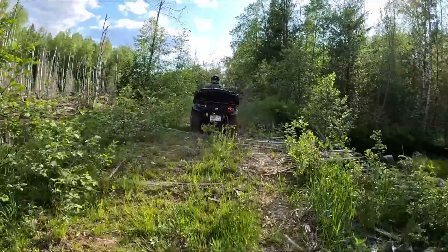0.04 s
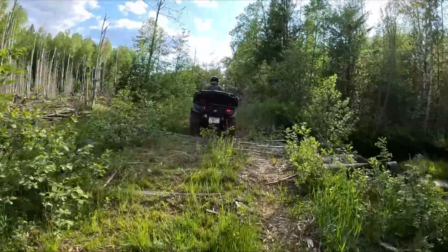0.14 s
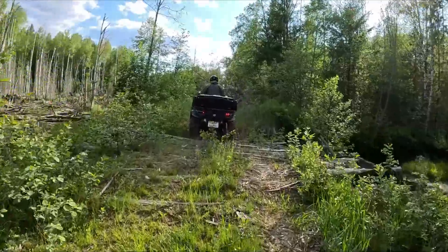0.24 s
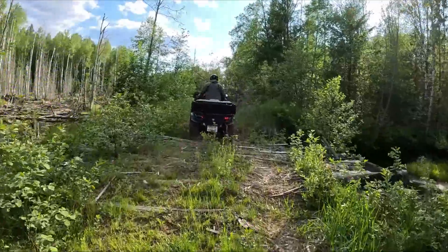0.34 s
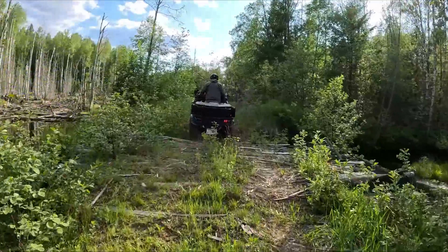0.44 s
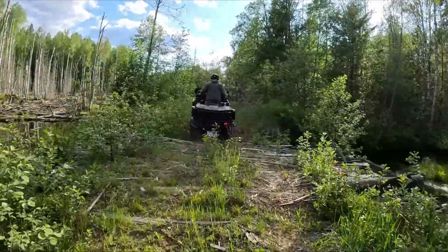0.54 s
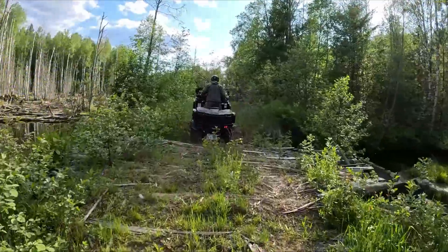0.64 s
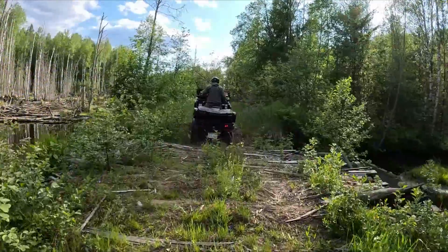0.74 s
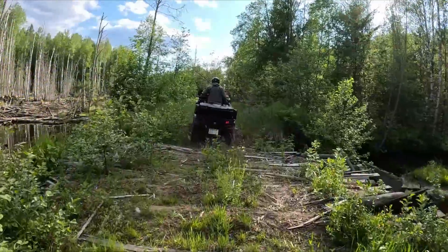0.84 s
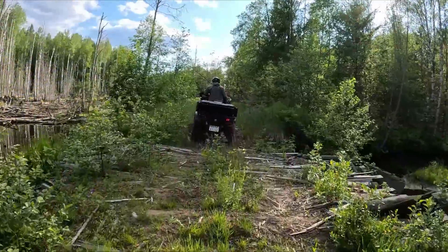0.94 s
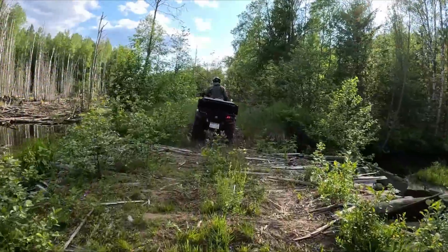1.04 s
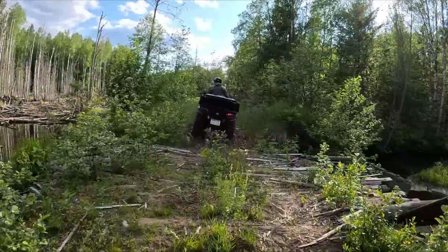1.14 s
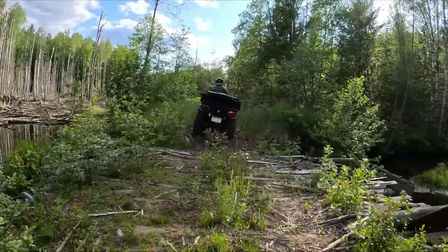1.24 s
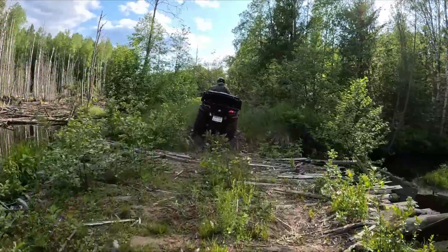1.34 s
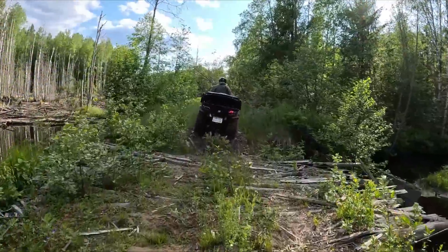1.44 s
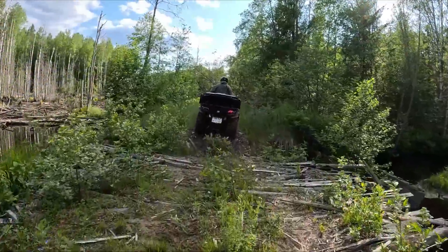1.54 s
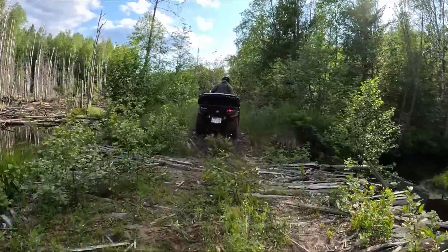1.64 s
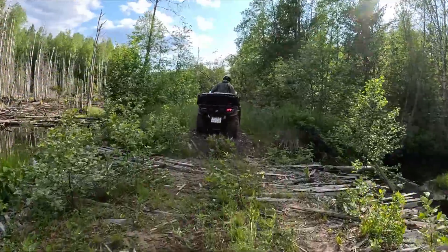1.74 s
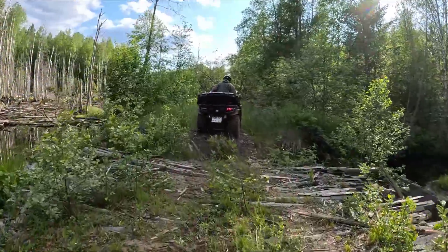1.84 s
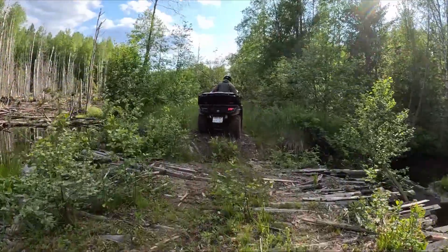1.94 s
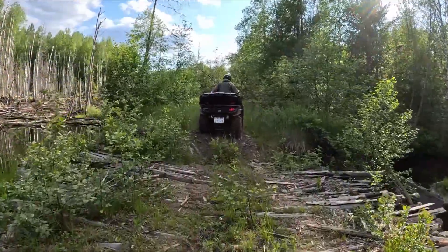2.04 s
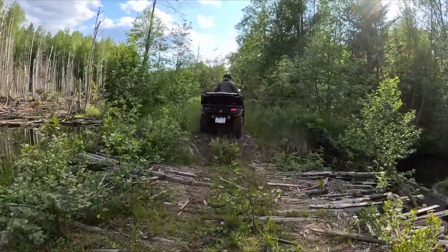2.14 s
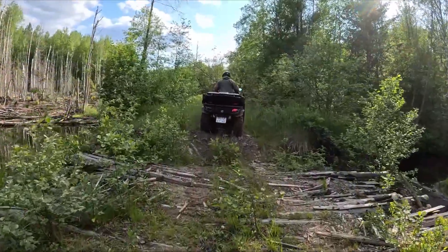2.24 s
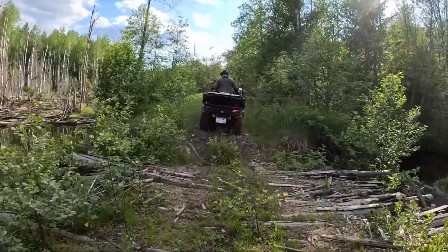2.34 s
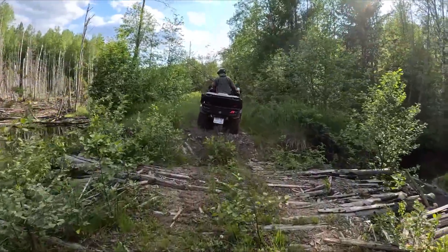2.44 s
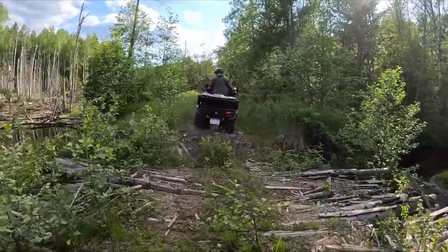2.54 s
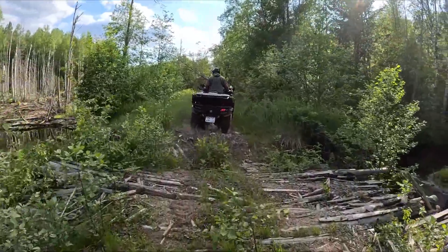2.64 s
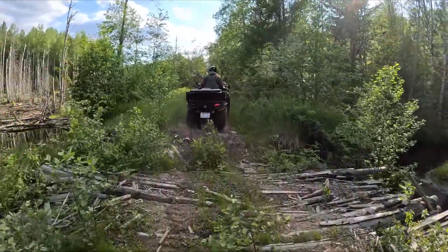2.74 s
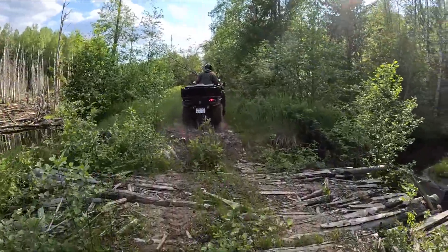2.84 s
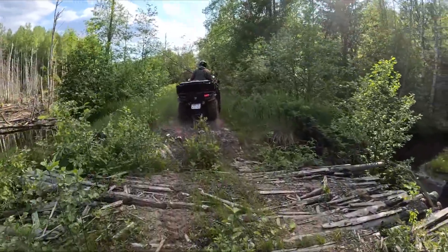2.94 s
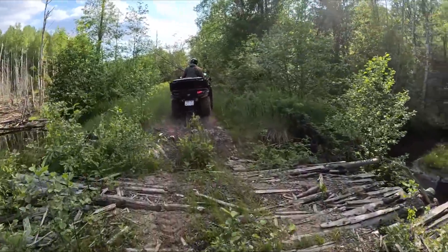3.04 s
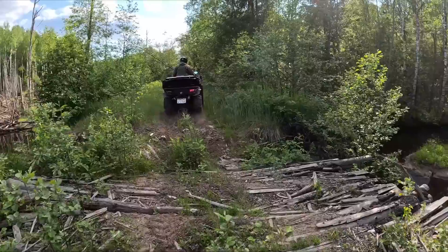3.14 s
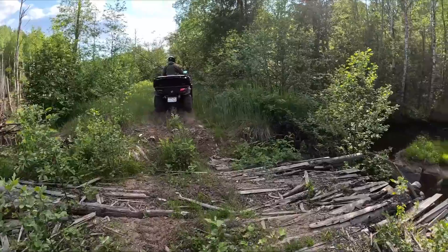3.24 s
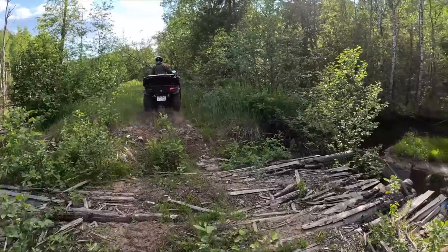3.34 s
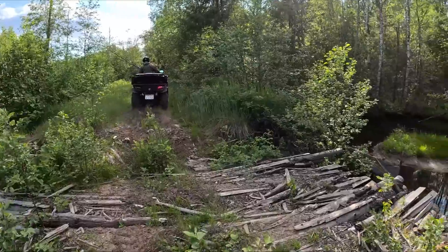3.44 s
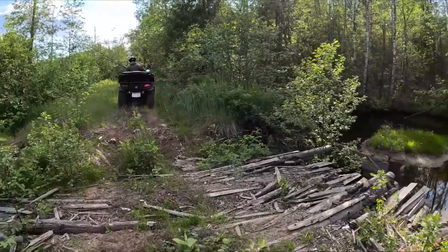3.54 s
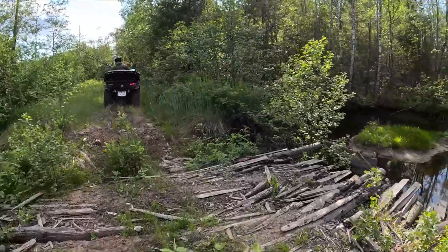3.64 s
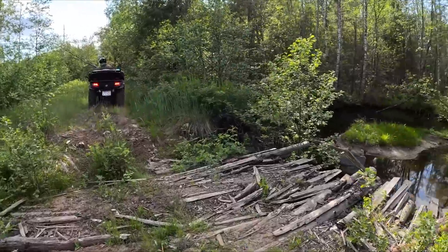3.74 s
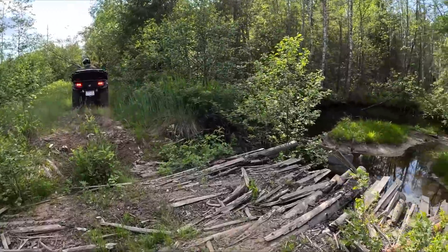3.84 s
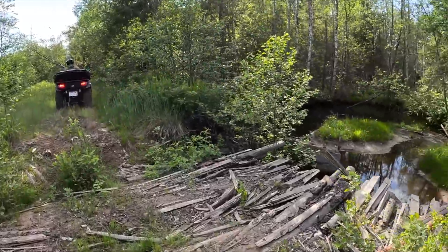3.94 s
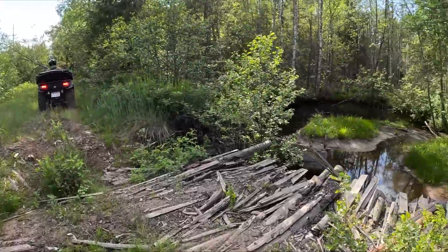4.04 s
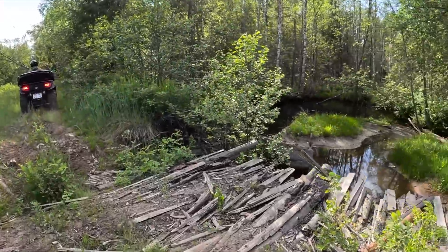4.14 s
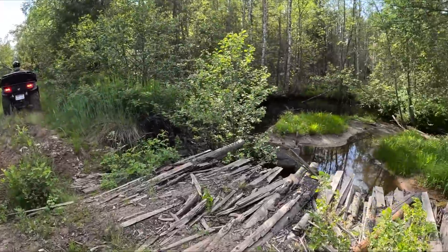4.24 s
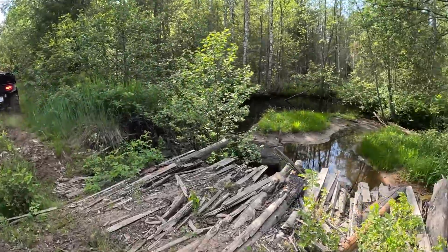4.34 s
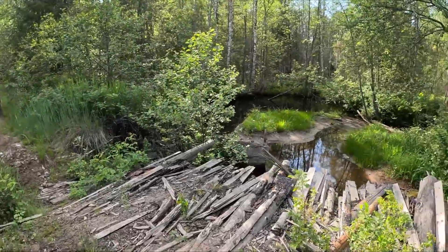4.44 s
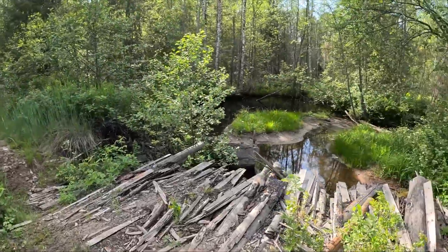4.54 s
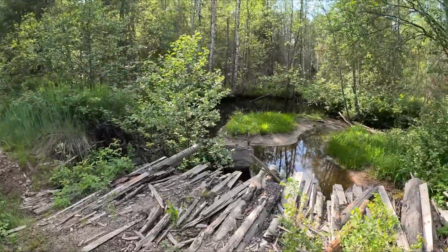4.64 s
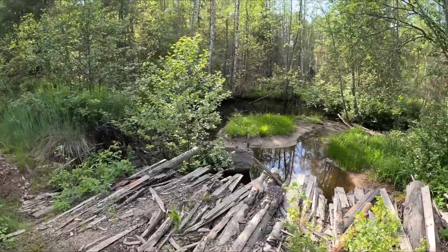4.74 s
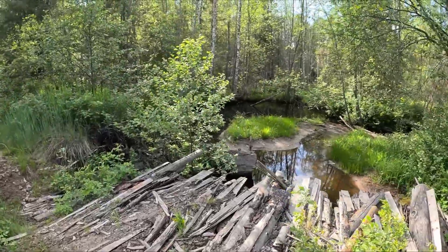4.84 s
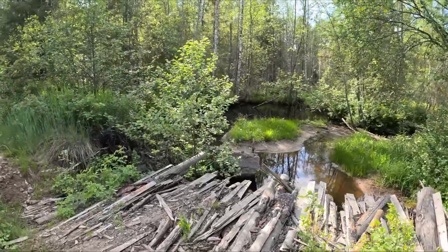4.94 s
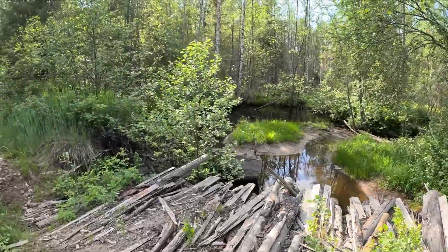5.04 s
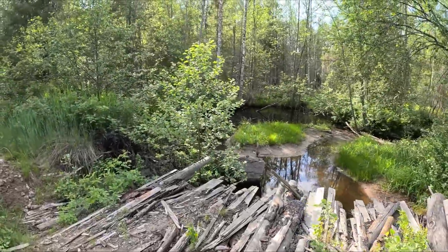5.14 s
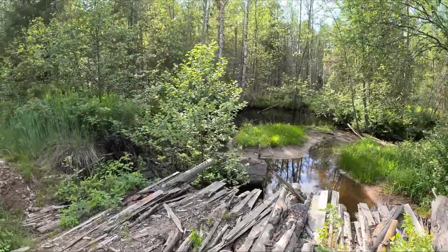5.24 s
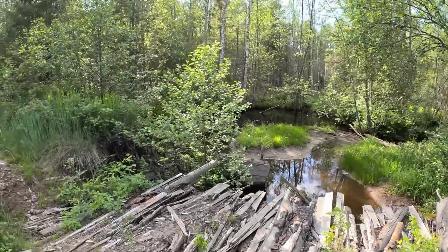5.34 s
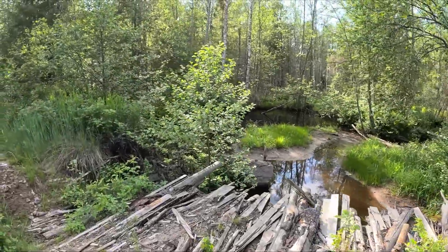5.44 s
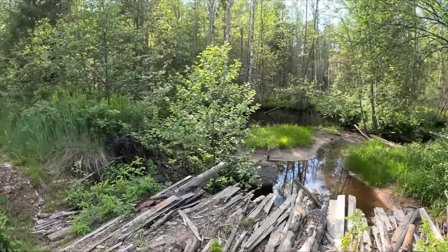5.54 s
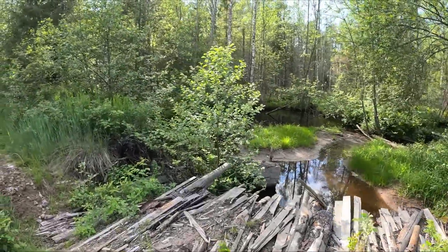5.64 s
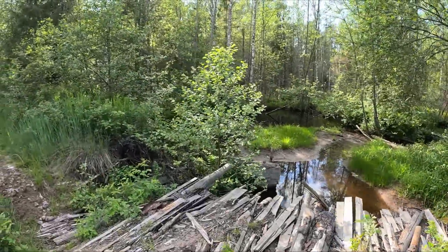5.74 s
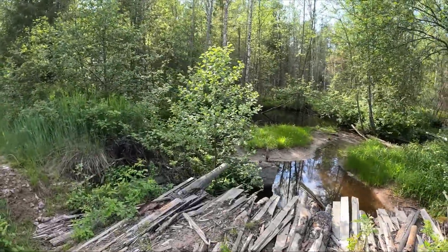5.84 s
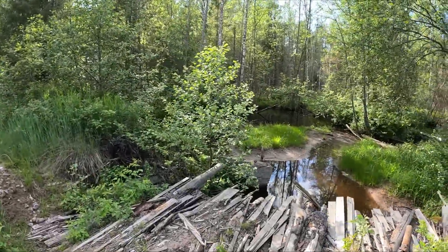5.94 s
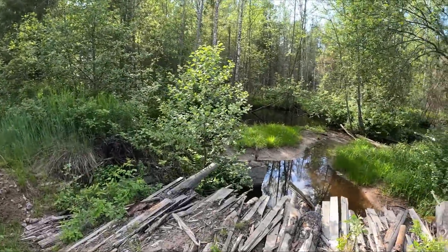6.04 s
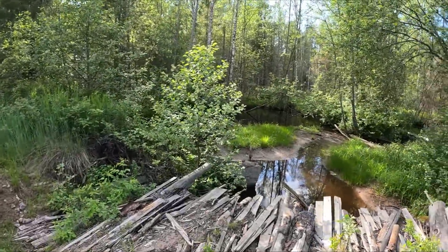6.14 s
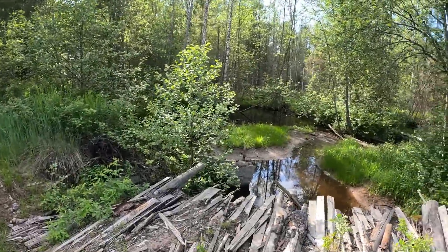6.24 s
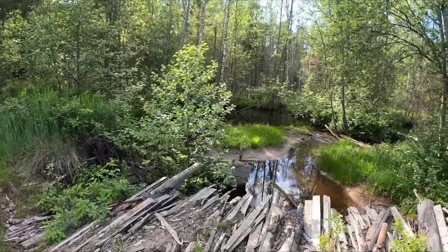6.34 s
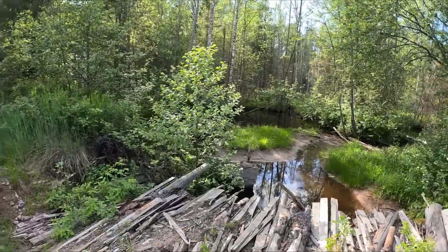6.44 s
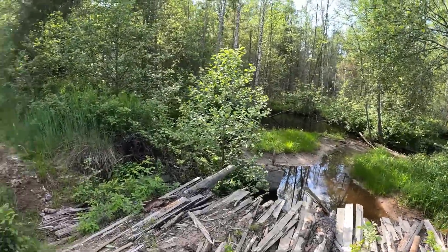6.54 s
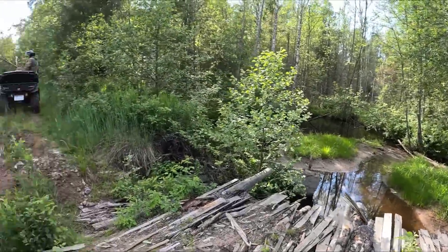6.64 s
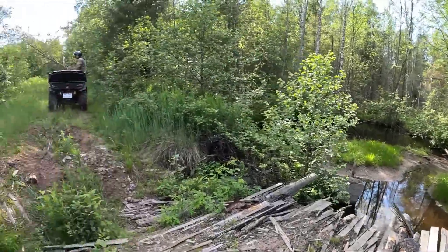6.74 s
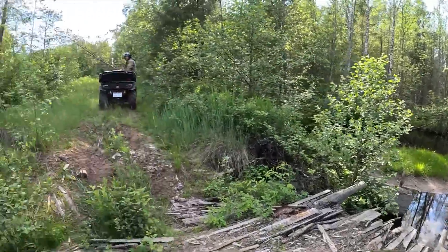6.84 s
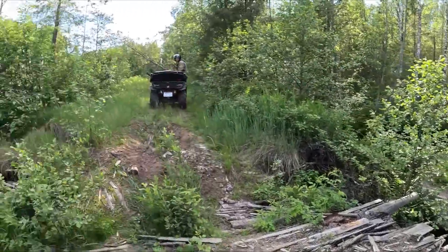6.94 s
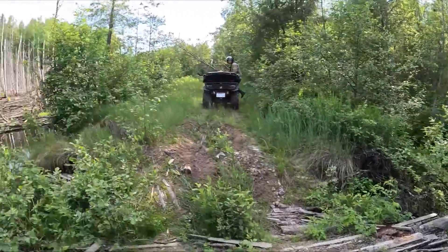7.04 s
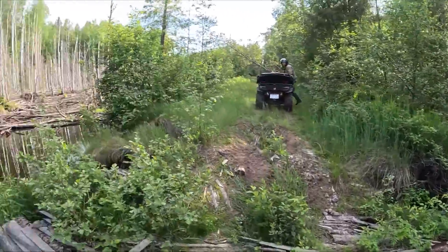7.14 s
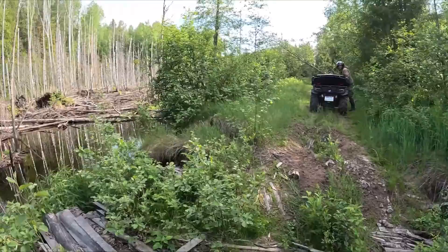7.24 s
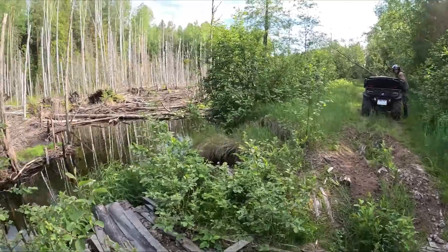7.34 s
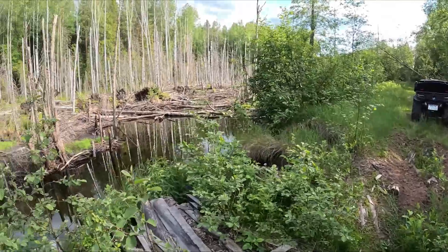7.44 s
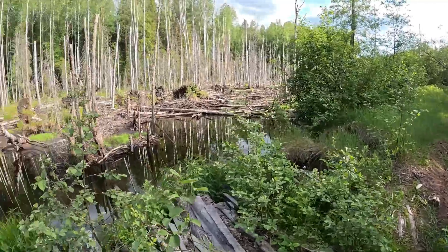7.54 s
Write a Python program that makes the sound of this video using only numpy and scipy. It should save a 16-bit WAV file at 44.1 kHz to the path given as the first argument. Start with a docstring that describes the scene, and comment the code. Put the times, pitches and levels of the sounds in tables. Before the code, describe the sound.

Close, throaty quad engine crawls, revs harder, sinks to a lumpy burbling idle and is switched off, leaving birdsong, faint wind and forest air.

```python
"""A forest track: a twin-cylinder quad bike crawls over logs, revs, drops to idle and is switched off.
Its gas pulses are damped cosines locked to the crank; roar, flutter and valve gear are noise gated by
the cycle; whine and hum are crank harmonics. Struck resonances make the jingling keys, idle burble and frame
knocks. Birds are gliding sines with a diffuse echo; rustle, wind, far rumble and forest are shaped noise."""
import sys
import numpy as np
from scipy import signal
from scipy.fft import rfft, irfft
from scipy.io import wavfile
from scipy.ndimage import uniform_filter1d

SR = 44100
rng = np.random.default_rng(int(sys.argv[2]) if len(sys.argv) > 2 else 0)


def log_audio(samples):
    """Write samples as a 16-bit WAV file to the path given in sys.argv[1]."""
    # one column per channel
    frames = np.atleast_2d(samples).T
    # limit to full scale, then quantise
    limited = np.clip(frames, -1, 1)
    pcm = np.round(limited * 32767).astype(np.int16)
    wavfile.write(sys.argv[1], SR, pcm)


N = 334719
TIME = np.arange(N) / SR


def amp(db):
    """Decibel law: 20 dB is a factor of ten in pressure."""
    return 10 ** (np.asarray(db) / 20)


def rms_one(x):
    """Normalisation by effective value: scale to rms 1."""
    return x / np.sqrt(np.mean(x ** 2) + 1e-20)


def in_time(rows, outside=None):
    """Linear interpolation: each column of a timed table at every sample."""
    seconds, *columns = np.transpose(rows)
    return [np.interp(TIME, seconds, column, left=outside, right=outside) for column in columns]


def at_hz(points, hz):
    """Logarithmic frequency scale: a spectrum interpolated along log frequency."""
    points = np.array(points)
    return np.interp(np.log(hz), np.log(points[:, 0]), points[:, 1])


def panned(x, db):
    """Interaural level difference: mono to stereo, left louder by db."""
    return np.outer(amp([db / 2, -db / 2]), x)


def add_at(out, start, sound):
    """Superposition: add a stereo sound from a start sample, cut at the end of the scene."""
    out[:, start:start + sound.shape[1]] += sound[:, :N - start]


def ring(clicks, hz, t60):
    """Damped resonator: a unit click sets a sine of initial height 1 ringing."""
    radius = amp(-60 / (max(t60, .002) * SR))
    angle = 2 * np.pi * hz / SR
    feedback = [1, -2 * radius * np.cos(angle), radius * radius]
    return signal.lfilter([0, np.sin(angle)], feedback, clicks + 1e-18)


def bandpass(x, order, low_hz, high_hz):
    """Band limitation: a Butterworth filter passes one band."""
    return signal.sosfilt(signal.butter(order, [low_hz, high_hz], "band", fs=SR, output="sos"), x)


def swell(s, db, rise, hold, t60):
    """Exponential decay: a gain that rises to its top at s, holds and dies away."""
    out = np.zeros(N)
    near = slice(max(int((s - rise) * SR), 0), int((s + hold + t60) * SR))
    t = TIME[near] - s
    decay = amp(db - 60 * np.maximum(t - hold, 0) / t60)
    out[near] = decay * np.clip(1 + t / rise, 0, 1) ** 2
    return out


# Left-right likeness of diffuse noise. Each row: frequency in Hz, correlation from 0 to 1.
LIKENESS = [(60, 0.74), (200, 1), (700, 0.97), (1300, 1), (2400, 0.84), (4400, 0.6), (8000, 1),
            (15000, 0.3)]


def coloured(spectrum, flicker_db):
    """Partial coherence: mid and side noise mixed by likeness, coloured, flickering in level; rms 1."""
    hz = np.maximum(np.fft.rfftfreq(N, 1 / SR), 1)
    alike = np.clip(at_hz(LIKENESS, hz), 0, 1)
    mid, side = rfft(rng.standard_normal((2, N))) * amp(at_hz(spectrum, hz))
    noise = irfft(np.sqrt(1 + alike) * mid + np.sqrt(1 - alike) * side * [[1], [-1]], N)
    flicker = np.interp(TIME, np.arange(400) / 50, rng.standard_normal(400))   # 50 points per second
    return rms_one(noise * amp(flicker_db * flicker))


# Crank speed. Each row: time in seconds, four-stroke cycles per second.
SPEED = [(0.0, 20.56), (0.2, 20.33), (0.42, 22.48), (0.64, 21.27), (0.76, 22.12), (0.9, 20.71),
         (1.18, 21.31), (1.52, 20.78), (1.72, 25.28), (2.1, 25.12), (2.6, 25.58), (2.9, 24.89),
         (3.12, 25.2), (3.3, 19.72), (3.42, 14.84), (3.95, 13.77), (4.2, 12.52), (4.9, 11.65), (5.7, 11.45),
         (6.0, 4.69), (6.6, 1.37)]
FIRST_CYCLE = .315   # share of the cycle already done at 0 s


def crank():
    """Phase is the integral of frequency: cycle rate and running cycle count."""
    speed = in_time(SPEED)[0]
    return speed, FIRST_CYCLE + np.cumsum(speed) / SR


# Engine states, in cycles per second: coasting without spark, idle, fast idle, crawl, pull.
STATES_PER_S = [10.2, 11.6, 14.2, 21.1, 25.2]
# Turns of the slosh before and after its crest, one value for each state.
SLOSH_RISE = (.4, .56, .92, .49, .7)
SLOSH_FALL = (.8, .76, .65, 1.34, .64)
# Gas pulses: first exhaust blow, its rebound from the pipe end, first intake closing, wave back from
# the silencer, second exhaust blow, second intake closing. Each row: place in the cycle (0-1),
# relative pressure, slosh in Hz; every column holds five values, one for each state.
PULSES = [
    [(0, .004, -.004, -.007, 0), (.2, -.38, -.29, -.59, -.52), (80, 93, 139, 113, 134)],
    [(.12, .157, .179, .152, .2), (-.05, -.09, -.27, .27, 0), (80, 150, 71, 134, 120)],
    [(.3, .319, .31, .274, .271), (.25, .25, .2, .11, .25), (75, 91, 136, 156, 150)],
    [(.44, .445, .466, .356, .41), (0, .014, .27, .13, .2), (120, 125, 97, 148, 111)],
    [(.55, .552, .468, .576, .586), (0, .12, -.26, -.35, -.33), (84, 79, 76, 105, 142)],
    [(.62, .666, .683, .745, .734), (.18, .07, .21, .27, .144), (60, 41, 60, 92, 75)],
]


def slosh(turns, rise, fall):
    """Damped oscillation: a slug of gas overshoots both ways, a cosine under a lopsided bell."""
    return np.cos(2 * np.pi * turns) * np.exp(-(turns / np.where(turns < 0, rise, fall)) ** 2)


def gas_pulses(cycle, speed, level_db):
    """Periodic excitation: gas pulses, a little varied each cycle, and idle pops at an evened level."""
    out = idle_pops()
    rise = np.interp(speed, STATES_PER_S, SLOSH_RISE)
    fall = np.interp(speed, STATES_PER_S, SLOSH_FALL)
    for row in PULSES:
        place, pressure, hz = [np.interp(speed, STATES_PER_S, column) for column in row]
        vary = amp(rng.normal(0, 0.49, 200))
        for back in range(2):   # neighbouring cycles overlap
            number = np.floor(cycle - place + .4) - back
            turns = (cycle - place - number) / speed * hz
            out += pressure * vary[number.astype(int) + 2] * slosh(turns, rise, fall)
    running_power = np.abs(uniform_filter1d(out ** 2, size=SR // 4))
    return out * amp(level_db) / np.sqrt(running_power + 1e-6)


# Silencer chambers. Each row: frequency in Hz, width in Hz, level in dB for a strike at 25 cycles per
# second, exponent of growth with speed.
SILENCER = [(198.5, 29.3, -25.5, 0.1), (276, 21, -34, 5.9), (347.5, 13.5, -37.5, 6.9)]


def silencer_ring(cycle, speed):
    """Impulse response: the sharp edge of the first exhaust blow rings the silencer chambers."""
    edges = np.diff(np.floor(cycle + 0.031), prepend=0) * (speed > STATES_PER_S[0])
    return sum(amp(db) * ring(edges * (speed / 25) ** growth, hz, 2.4 / width)
               for hz, width, db, growth in SILENCER)


# Gear whine while crawling. Each row: time in seconds, rms level in dB.
WHINE = [(0, -36), (.25, -41), (.45, -43), (.7, -42), (.95, -38.5), (1.2, -42.5), (1.5, -38.5), (1.58, -44),
         (1.66, -72)]
# Exhaust hum while crawling. Each row: time in seconds, rms level in dB.
HUM = [(0, -26), (.5, -28), (1.0, -31), (1.5, -25), (1.62, -49)]
WHINE_ORDER, HUM_ORDER = 17, 9   # multiples of the cycle rate


def crank_tone(rows, order, cycle):
    """Order locking: a sine at a fixed multiple of the cycle rate."""
    return np.sqrt(2) * amp(in_time(rows, outside=-140)[0]) * np.sin(2 * np.pi * order * cycle)


def gear_whine(cycle):
    """Harmonic of rotation: a clean gear tone locked to the crank."""
    return crank_tone(WHINE, WHINE_ORDER, cycle)


def exhaust_hum(cycle):
    """Harmonic of the gas cycle: an exhaust tone locked to the crank."""
    return crank_tone(HUM, HUM_ORDER, cycle)


RASP_HZ, RASP_T60_S, RASP_DB = 497, .025, -16.5   # level relative to the hum


def rasp():
    """Resonant filtering: noise in one resonance, following the hum's level."""
    noise = ring(rng.standard_normal(N), RASP_HZ, RASP_T60_S)
    return amp(in_time(HUM, outside=-140)[0] + RASP_DB) * rms_one(noise)


# Valve events. Each row: place in the cycle (0-1), relative level in dB before the depth factor,
# decay length (to 1/e) in cycles.
TICKS = [(0.9, 11, 0.073), (0.02, 8, 0.043), (0.6, 3.5, 0.046), (0.7, -4.5, .06)]


def beat(cycle, depth):
    """Amplitude modulation: a gain of rms 1 that jumps at each valve event and relaxes after it."""
    db = sum(level * np.exp(-((cycle - place) % 1) / length) for place, level, length in TICKS)
    return rms_one(amp(depth * uniform_filter1d(db, size=80)))


# Turbulent gas. Each row: frequency in Hz, relative level in dB per Hz.
FLUTTER = [(110, -41.5), (170, 9), (205, -0.5), (260, -5.5), (340, -10), (400, -23), (600, -61.5)]


def gas_flutter(cycle, level_db):
    """Turbulence noise: low noise lightly modulated by the cycle."""
    return amp(level_db) * beat(cycle, depth=0.085) * coloured(FLUTTER, flicker_db=2.5)


# Engine roar. Each row: frequency in Hz, relative level in dB per Hz.
ROAR = [(240, -45), (400, -12.5), (524, -6), (770, -2), (840, -5), (934, 0.5), (1020, -4), (1110, -3),
        (1330, -7), (1830, -12), (2140, -8), (2910, -27), (4000, -28.5), (5200, -66), (8800, -120)]


def engine_roar(cycle, level_db):
    """Modulated broadband noise: the roar pulses with the cycle."""
    return amp(level_db) * beat(cycle, depth=0.57) * coloured(ROAR, flicker_db=2.0)


# Valve gear. Each row: frequency in Hz, relative level in dB per Hz.
VALVES = [(1470, -26), (2500, 4), (4050, -14.5), (5410, -6), (6110, -10.5), (7810, -11.5), (9550, -14),
          (14000, -50.5)]
VALVE_DB, VALVE_FOLLOWS = -56, 0.97   # level at a roar of -40.5 dB; share of the roar's swing in dB


def valve_gear(cycle, roar_db):
    """Impact noise: high noise deeply modulated by the valve events, following the roar."""
    level_db = VALVE_DB + VALVE_FOLLOWS * (roar_db + 40.5)
    return amp(level_db) * beat(cycle, depth=1.3) * coloured(VALVES, flicker_db=3.5)


# Wind gusts on the microphone. Each row: time in seconds, peak of the rms level in dB.
GUSTS = [(6.26, -65), (6.51, -55), (6.75, -58), (6.87, -37), (7.13, -46), (7.235, -42), (7.49, -49),
         (7.59, -40)]
GUST_S, LULL_DB = 0.037, -56   # half length of a gust (to 1/e); level between gusts
SHAKING_DB = -34   # while the engine shakes the mount


def wind(stops_db):
    """Flow-induced pressure noise: lumpy low noise on the microphone, with the shaking of its mount."""
    low = bandpass(rng.standard_normal(N), 4, 18, 46)
    gusts = sum(amp(db) * np.exp(-((TIME - s) / GUST_S) ** 2) for s, db in GUSTS)
    return (amp(SHAKING_DB + stops_db) + amp(LULL_DB) + gusts) * rms_one(low)


# A far engine, which draws away. Each row: time in seconds, rms level in dB.
FAR = [(0, -49.5), (6.5, -49.5), (7.0, -60.5), (7.59, -66)]
FAR_HZ, FAR_T60_S = 276, .02   # of each of two equal resonances


def far_rumble():
    """Cascaded resonance: noise twice through one low resonance."""
    once = ring(rng.standard_normal(N), FAR_HZ, FAR_T60_S)
    return amp(in_time(FAR)[0]) * rms_one(ring(once, FAR_HZ, FAR_T60_S))


# Forest background. Each row: frequency in Hz, relative level in dB per Hz.
FOREST = [(44, -46), (70, -8.5), (100, -15.5), (151, -8), (184, 3), (526, -23), (909, -25.5), (1260, -21.5),
          (1680, -25.5), (2330, -21.5), (2710, -26.5), (4900, -27), (9440, -46), (14000, -84)]


def forest_air():
    """Diffuse field: steady coloured noise, partly alike in both channels."""
    return amp(-49) * coloured(FOREST, flicker_db=1.5)


# Knocks of frame and plastics. Each row: start in seconds, peak of the noise body in dB, main frequency
# in Hz, t60 in seconds, peak of the bright crack relative to the noise body in dB, left-right level in dB.
KNOCKS = [(0.224, -37, 840, 0.027, -24, -2), (0.4726, -24, 847, 0.044, -17, 0),
          (0.5857, -43.5, 980, 0.046, 4, 3), (0.9398, -26.5, 1950, 0.13, -5.5, 1.5),
          (0.9687, -28, 1500, 0.096, -3.5, -1), (1.2506, -32.5, 1050, 0.019, -11.5, 5),
          (1.3913, -28.5, 1080, 0.041, -14, 0), (1.8218, -26, 930, 0.019, -11, -2.5),
          (1.9054, -33, 1060, 0.041, -24, 1), (2.6045, -25.5, 1680, 0.2, -5.5, -3),
          (2.6476, -26.5, 1340, 0.023, -8.5, -4), (2.7242, -24, 920, 0.023, -10.5, -3),
          (3.3662, -34, 2250, 0.069, -21, 4), (3.7708, -30, 1860, 0.024, -28, 7),
          (3.8173, -31.5, 1330, 0.053, -13, -2), (4.3656, -39.5, 2420, 0.038, -10, 6),
          (4.4942, -31, 2100, 0.034, -30, 8), (4.515, -28, 2120, 0.016, -23, 2),
          (4.5262, -25.5, 2440, 0.022, -22, 7), (4.5562, -41, 970, 0.019, -8, 8),
          (4.704, -44, 2610, 0.02, -9, 7), (4.7429, -26, 1540, 0.023, -28, 7),
          (4.7456, -35.5, 2260, 0.028, -32, 5), (5.099, -34.5, 2480, 0.023, -24, 4),
          (5.221, -36, 965, 0.025, -27, 6), (5.9288, -44, 1120, 0.02, -22, 4),
          (5.9444, -43, 795, 0.033, -9, 6), (6.133, -37, 930, 0.025, -8, 3),
          (6.183, -36, 760, 0.03, -32, 7), (6.2196, -35, 2100, 0.022, -27, 5),
          (7.0953, -43.5, 990, 0.021, -6, 5), (7.479, -44.5, 1390, 0.013, -10, 5)]
PANEL_RING, BRIGHT_DB = 1.42, -9.5   # ring height in a dull knock; crack level that halves the ring
RACK_HZ, RACK_T60_S = 3573, 0.14   # a metal rack rings along with the brighter knocks


def knocks():
    """Impact radiation: a panel's ring, a dying noise burst and a bright crack with the rack's ring."""
    out = np.zeros((2, N))
    t = TIME[:SR // 5]
    rack = 0.3 * amp(-60 * t / RACK_T60_S) * np.sin(2 * np.pi * RACK_HZ * t)
    for s, db, hz, t60, bright_db, pan_db in KNOCKS:
        decay = amp(-60 * t / max(t60, .004)) * np.minimum(t / 0.00038, 1)
        burst = rng.standard_normal(len(t)) * decay
        body = bandpass(burst, 3, hz / 1.6, hz * 1.6)
        crack = bandpass(burst, 3, 3500, 10000)
        ring_height = PANEL_RING / (1 + amp(2 * (bright_db - BRIGHT_DB)))
        panel = ring_height * decay * np.sin(2 * np.pi * hz * t)
        bright = amp(bright_db) * (crack / np.abs(crack).max() + rack)
        hit = amp(db) * (body / np.abs(body).max() + panel + bright)
        add_at(out, round(s * SR), panned(hit, pan_db))
    return out


# Modes of the keys. Each row: frequency in Hz before detuning, relative level in dB,
# twice the t60 in seconds.
KEYS = [(5380, 3, 0.089), (5700, -6, 0.12), (6020, -3.5, 0.1), (6220, 2.5, 0.052), (6700, -14, 0.38),
        (6895, -5.5, 0.34), (7500, -15, 0.2), (7260, -17, 0.1), (7840, -1, 0.4), (7540, -8, 0.11),
        (7570, -6, 0.15), (8500, -4, 0.099), (8600, -17.5, 0.11), (9100, -7.5, 0.17), (9750, -16.5, 0.14),
        (10020, 2, 0.071), (11560, -5.5, 0.14), (13070, -2.5, .1), (13000, -17, .1), (4740, -3, 0.098),
        (10300, -12, 0.061), (14100, -25, .08)]
# Shakes of the key bunch. Each row: time in seconds, peak level in dB, centre frequency in Hz.
SHAKES = [(0.42, -56, 6900), (0.506, -61, 7860), (1.381, -45, 7100), (1.46, -49, 5440), (1.515, -49, 7700),
          (1.576, -48.5, 7100), (1.92, -42.5, 8060), (1.971, -48.5, 7500), (2.053, -49.5, 6200),
          (2.66, -44.5, 6900), (2.72, -54, 6300), (2.925, -46.5, 6600), (2.972, -47.5, 9600),
          (3.054, -40.5, 6120), (3.13, -45, 6100), (3.184, -44.5, 6200), (3.24, -49.5, 6870),
          (3.297, -50, 5800), (3.526, -57, 6990), (3.59, -58, 9300), (3.639, -48.5, 9650),
          (3.73, -54, 6600), (3.78, -50.5, 6600), (3.853, -50, 5300), (3.89, -65, 7800), (4.518, -49, 7500),
          (4.565, -52, 7500), (4.595, -79, 12100), (4.7, -62, 7600), (4.78, -75, 8800)]
SHAKE_RISE_S, SHAKE_T60_S = 0.032, 0.26
LEAD_DB, LEAD_T60_S = -2, 0.18   # in each shake one key rings on at the centre pitch


def keys():
    """Modal synthesis: random glancing touches strike each mode, most strongly near the centre pitch."""
    level, lead = np.zeros(N), np.zeros(N)
    for s, db, hz in SHAKES:
        level += swell(s, db, SHAKE_RISE_S, 0, SHAKE_T60_S)
        lead += swell(s, db + LEAD_DB, SHAKE_RISE_S, 0, LEAD_T60_S) * np.sin(2 * np.pi * hz * TIME)
    centre_hz = in_time(SHAKES)[1]
    jingle = np.zeros(N)
    for hz, db, t60 in KEYS:
        for detune in (.955, .98, 1.002):   # like keys of the bunch ring a little apart
            touch, at = np.zeros(N), rng.integers(0, N, size=340)
            off_centre_db = -14 * np.log2(hz / centre_hz[at]) ** 2
            touch[at] = amp(db + rng.normal(0, 7, len(at)) + off_centre_db)
            soft_touch = ring(touch, hz * detune, 0.0033)   # a short ring softens the strike
            jingle += ring(soft_touch, hz * detune, 0.5 * t60)
    running_power = np.abs(uniform_filter1d(jingle ** 2, size=SR // 16))
    return panned(lead + level * jingle / np.sqrt(running_power + 1e-9), 1.2)


BURBLE_HZ, BURBLE_T60_S, BURBLE_DB = 198.5, 0.17, -28
BURBLE_BELOW_PER_S = 17   # cycles per second under which the burble sets in


def burble(cycle, speed):
    """Stochastic excitation: at idle two uneven strikes, a third and half way through the cycle, ring the silencer."""
    strikes = sum(np.diff(np.floor(cycle - place), prepend=0) for place in (.33, .52))
    spark_on = speed > STATES_PER_S[0]
    idle = np.clip(BURBLE_BELOW_PER_S - speed, 0, 1) * spark_on
    return amp(BURBLE_DB) * ring(strikes * idle * rng.normal(1, 0.46, N), BURBLE_HZ, BURBLE_T60_S)


# Harder pops in the uneven idle. Each row: time in seconds, relative pressure on the gas pulses' scale.
POPS = [(3.469, 0.061), (3.675, 0.059), (3.817, 0.14), (3.961, 0.071), (4.112, 0.15), (4.189, 0.22),
        (4.348, 0.55), (4.513, 0.21), (4.597, 0.15), (4.766, 0.17), (4.848, 0.23), (4.934, 0.051),
        (5.112, 0.28), (5.197, 0.06), (5.457, 0.21), (5.63, 0.13)]


def idle_pops():
    """Transient gas discharge: single inverted sloshes at 98 Hz."""
    out = np.zeros(N)
    for s, pressure in POPS:
        near = slice(int((s - .03) * SR), int((s + .06) * SR))
        out[near] -= pressure * slosh((TIME[near] - s) * 98, .45, .85)
    return out


# Bird slides. Each row: start in seconds, length in seconds, first frequency in Hz, last frequency in Hz,
# peak level in dB, bend (over 1 moves late, under 1 early), left-right level in dB.
SLIDES = [(4.33, 0.031, 2710, 2300, -44.5, 1.8, 2), (5.492, 0.035, 2610, 1990, -44, 1.5, 6),
          (5.74, 0.035, 2604, 1930, -40, 1.9, 3), (5.995, 0.033, 2594, 1960, -39.5, 1.4, 3),
          (6.248, 0.028, 2570, 1940, -37.5, 1.84, 5), (7.515, 0.045, 2540, 1840, -39, 1.7, -7),
          (6.71, 0.19, 6700, 6900, -69, 0.38, 0), (6.995, 0.097, 5530, 6740, -63, 0.51, 0),
          (7.14, 0.058, 5700, 6500, -64, 0.35, 0), (7.295, 0.027, 5600, 6540, -73, .6, -5),
          (6.935, 0.024, 5220, 4200, -62, 1.2, 5), (7.065, 0.022, 4900, 3400, -57, 1.3, -4),
          (7.235, 0.024, 4080, 2830, -51, 1.26, -2), (7.395, 0.02, 4040, 2800, -48, 1.3, -5),
          (7.55, 0.018, 4080, 2900, -47, 0.99, -2)]


def bird_slides():
    """Frequency modulation: short sines glide between two pitches."""
    out = np.zeros((2, N))
    for s, length, from_hz, to_hz, db, bend, pan_db in SLIDES:
        u = np.linspace(0, 1, int(length * SR))
        hz = from_hz + (to_hz - from_hz) * u ** bend
        note = np.sin(2 * np.pi * np.cumsum(hz) / SR) * np.sin(np.pi * u ** 0.57)
        add_at(out, int(s * SR), panned(amp(db) * note, pan_db))
    return out


# Held bird notes. Each row: time of full level in seconds, hold in seconds, mean frequency in Hz,
# rms level in dB.
TRILLS = [(6.68, 0.14, 5260, -62), (6.887, 0.066, 5040, -60), (6.96, 0.027, 4950, -63),
          (7.02, .07, 4900, -59), (7.12, 0.063, 4940, -65), (7.165, 0.067, 4067, -53.5),
          (7.317, 0.07, 4100, -58), (7.435, 0.02, 4076, -58), (7.487, 0.045, 4130, -56)]
TRILL_RISE_S, TRILL_T60_S = .015, .3


def bird_trills():
    """Random frequency modulation: held sines warble about their pitch."""
    out = np.zeros((2, N))
    for s, length, hz, db in TRILLS:
        warble = 1 + 0.011 * np.interp(TIME, np.arange(2000) / 250, rng.standard_normal(2000))
        note = np.sin(2 * np.pi * np.cumsum(hz * warble) / SR)
        out += panned(np.sqrt(2) * swell(s, db, TRILL_RISE_S, length, TRILL_T60_S) * note, 0.92)
    return out


def birds():
    """Diffuse reverberation: slides and trills convolved with a decaying noise echo of the trees."""
    out = bird_slides() + bird_trills()
    t = TIME[:SR]
    trees = rng.standard_normal((2, SR)) * amp(-60 * t / 0.98) * np.minimum(t / 0.016, 1)
    echo = signal.fftconvolve(out.mean(0, keepdims=True), trees, axes=1)[:, :N]
    return out + amp(-36.5) * echo


# Cloth and glove rustle. Each row: time of full level in seconds, hold in seconds, rms level in dB,
# centre frequency in Hz.
RUSTLE = [(5.815, 0.032, -53.5, 5130), (6.138, 0.08, -40.5, 1070)]
RUSTLE_RISE_S, RUSTLE_T60_S = 0.019, 0.28


def rustle():
    """Friction noise: crackly grains of random strength in a broad band."""
    out = np.zeros(N)
    for s, length, db, hz in RUSTLE:
        strength_db = 3.2 * np.repeat(rng.standard_normal(N // 200 + 1), 200)[:N]
        grains = rng.standard_normal(N) * amp(strength_db)
        band = bandpass(grains, 2, hz / 1.84, hz * 1.45)
        out += swell(s, db, RUSTLE_RISE_S, length, RUSTLE_T60_S) * rms_one(band)
    return panned(out, 3.5)


# Engine load, before the fade at the stop. Each row: time in seconds, gas pulses in dB, roar in dB,
# gas flutter in dB.
LOAD = [(0.0, -15, -42.5, -28), (0.46, -14, -39, -31.5), (0.77, -16, -42, -27.5), (0.96, -14, -40, -32),
        (1.32, -14, -41.5, -33), (1.49, -14, -37.5, -39), (1.8, -13.5, -34.5, -29), (2.55, -13, -37.5, -32),
        (2.76, -15, -38, -27.5), (3.12, -14, -34.5, -35), (3.29, -16, -38, -32.5), (3.5, -17, -46, -44),
        (3.8, -17, -43.5, -40), (4.2, -18, -47.5, -40), (5.66, -17, -48, -42), (5.76, -24, -48.5, -39.5),
        (5.92, -28.5, -50.5, -40.5), (6.1, -35, -60, -51), (6.22, -60, -60, -47)]
STOP_S, STOP_FADE_S = 6.15, 0.43   # the stopping engine fades by a further 30 dB


def scene():
    """Superposition: the engine close by, its rattles and the forest around."""
    speed, cycle = crank()
    stops_db = -30 * np.clip((TIME - STOP_S) / STOP_FADE_S, 0, 1)
    pulse_db, roar_db, flutter_db = in_time(LOAD) + stops_db
    engine = gas_pulses(cycle, speed, pulse_db) + silencer_ring(cycle, speed) + burble(cycle, speed)
    engine = engine + gear_whine(cycle) + exhaust_hum(cycle) + rasp()
    noises = gas_flutter(cycle, flutter_db) + engine_roar(cycle, roar_db) + valve_gear(cycle, roar_db)
    rattles = knocks() + keys() + rustle()
    surroundings = wind(stops_db) + far_rumble() + forest_air() + birds()
    return engine + noises + rattles + surroundings


# Phase between the two microphone ports. Each row: frequency in Hz, lead of the left in radians.
PORTS = [(0, 0), (2840, -1.1), (3530, -.6), (3880, -1.3), (4740, .1), (5510, -.1), (12800, 0), (13500, -.7),
         (15300, 0)]
CUTOFF_HZ = 15700   # from here up the top is 70 dB down


def record(dry):
    """Interchannel phase and band limits: the ports differ in phase; deepest bass and top are cut."""
    lead = np.interp(np.fft.rfftfreq(N, 1 / SR), *np.transpose(PORTS))
    dry = irfft(rfft(dry) * np.exp(.5j * lead * [[1], [-1]]), N)
    dry = signal.sosfilt(signal.butter(1, 12, "high", fs=SR, output="sos"), dry)
    return signal.sosfilt(signal.cheby2(12, 70, CUTOFF_HZ, fs=SR, output="sos"), dry)


dry = scene()
out = record(dry)
log_audio(out)
```